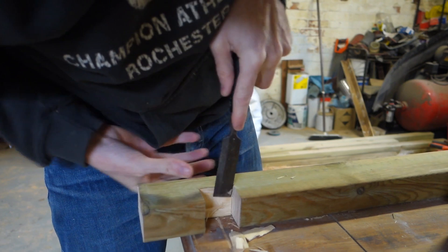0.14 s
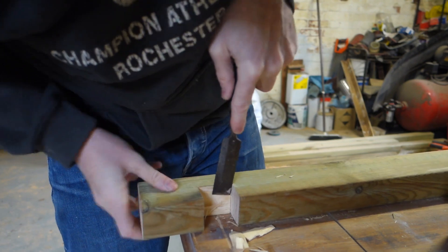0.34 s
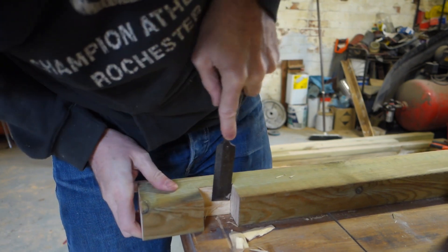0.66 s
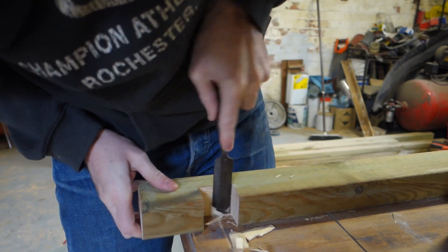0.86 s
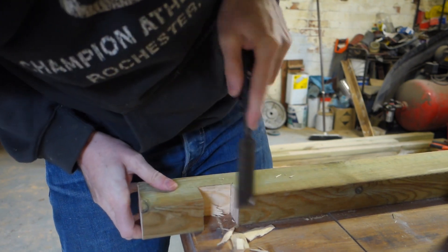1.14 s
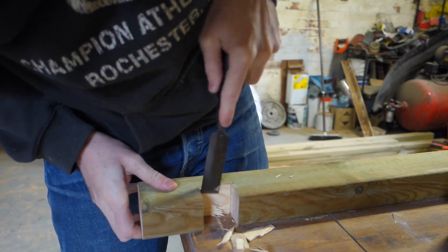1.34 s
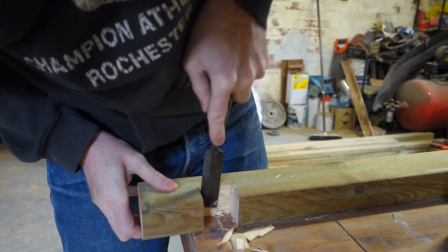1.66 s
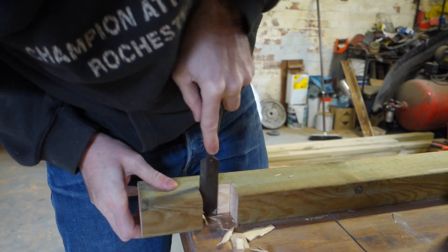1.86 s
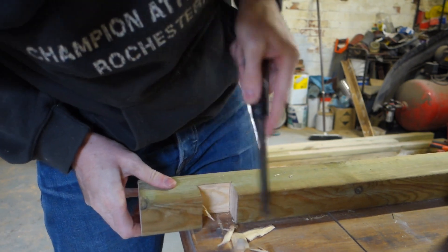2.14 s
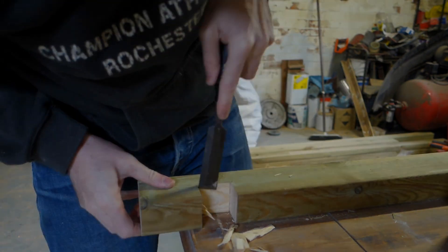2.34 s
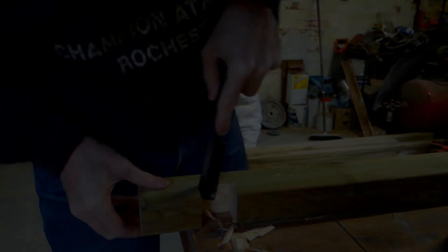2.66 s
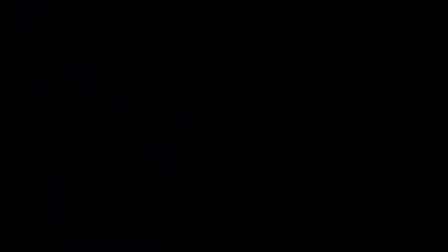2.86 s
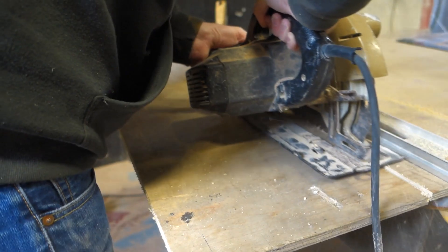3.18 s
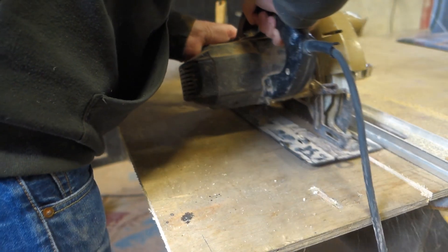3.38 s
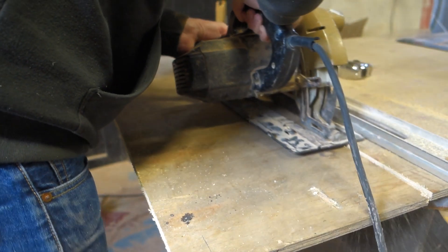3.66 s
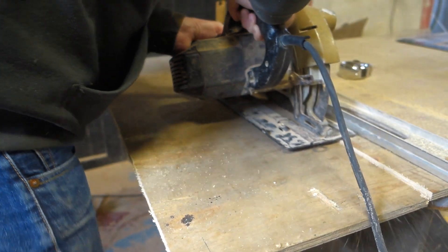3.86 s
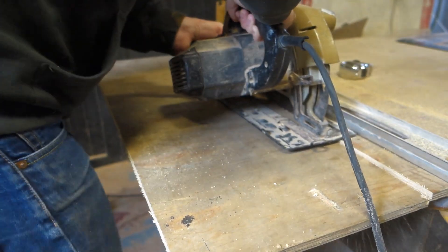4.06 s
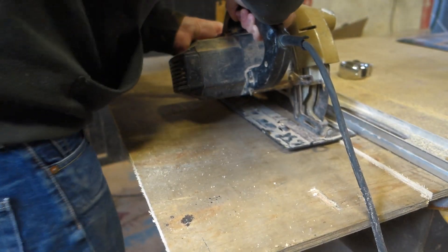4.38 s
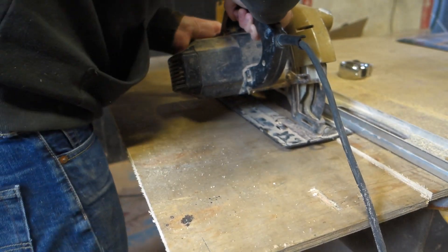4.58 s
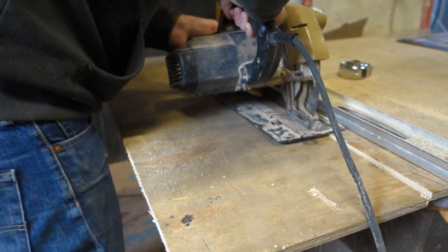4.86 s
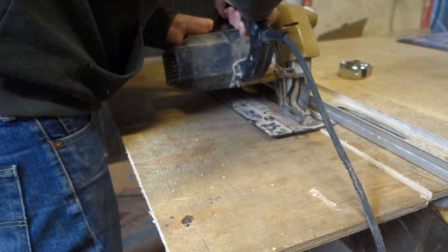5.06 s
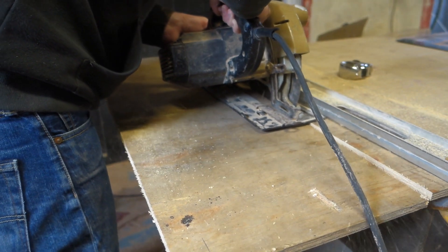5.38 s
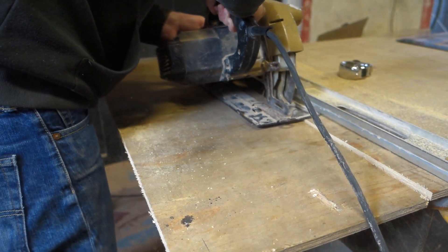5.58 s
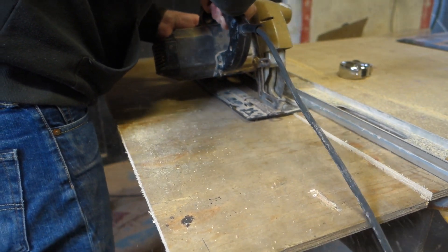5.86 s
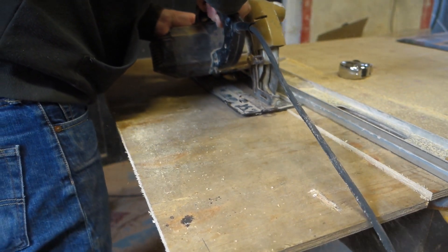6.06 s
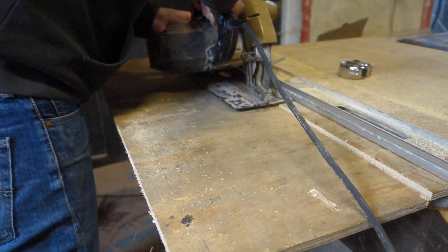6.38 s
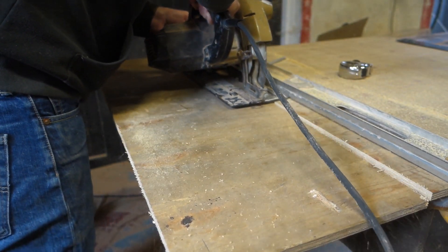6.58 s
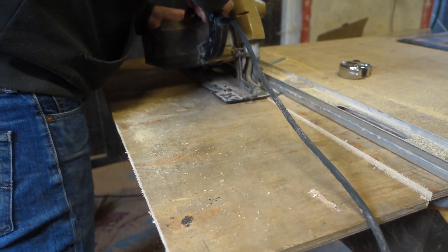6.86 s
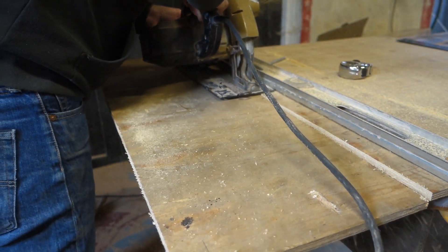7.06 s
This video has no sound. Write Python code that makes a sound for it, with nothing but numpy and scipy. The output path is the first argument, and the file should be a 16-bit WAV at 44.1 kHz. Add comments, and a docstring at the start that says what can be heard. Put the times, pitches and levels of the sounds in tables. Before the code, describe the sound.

Close up in a small workshop, a chisel works into a softwood beam with a few sharp knocks, short crunching scrapes, tiny splinter snaps and dull thumps against the bench. This fades away. About three seconds in, a circular saw cuts in abruptly, already ripping a board, slightly to the right. It rasps steadily, with a ringing blade, hissing chips and a high whine, then a lower motor hum near the end.

```python
"""A chisel is pushed and tapped into a softwood beam, close to a stereo microphone in a small workshop.
Knocks ring the beam; the edge sticks and slips, shaking the bench and tearing fibres; the sound fades out.
Hard cut at about 3 s to a circular saw ripping a board, right of the microphone and drifting to the middle:
its teeth shake the blade's modes, chips hiss, the board rumbles, the gears whine and the motor hums."""
import sys
import numpy as np
from scipy import signal
from scipy.fft import rfft, irfft, next_fast_len
from scipy.io import wavfile
from scipy.ndimage import uniform_filter1d

SR = 44100
rng = np.random.default_rng(int(sys.argv[2]) if len(sys.argv) > 2 else 0)


def unload_wav(signal):
    """Save mono or channel-first audio to the path in sys.argv[1] as 16-bit WAV at rate SR, clipped to [-1, 1]."""
    wavfile.write(
        sys.argv[1],
        SR,
        np.round(np.clip(np.atleast_2d(signal).T, -1, 1) * 32767).astype(np.int16),
    )


N = 318843
T = np.arange(N) / SR
CUT_S = 2.9772  # from chisel to saw

# the saw's course through the board: time_s, cutting_db, chips_db
SAW_LEVELS = [(2.99, -18.5, -24), (3.1, -19, -25), (3.52, -19.5, -24), (3.64, -20.5, -23),
              (4.05, -16, -24.5), (4.31, -21, -32), (4.6, -23, -23.5), (4.7, -15, -21.5),
              (4.76, -20, -25.5), (4.96, -19, -21), (5.02, -22, -22), (5.16, -16, -18), (5.2, -19, -20.5),
              (5.3, -20.5, -21.5), (5.36, -15.5, -18), (6.1, -17, -19), (6.6, -16.5, -17),
              (6.76, -15.5, -18.5), (6.83, -20, -20.5), (6.87, -15.5, -13), (7.16, -18, -18.5),
              (7.18, -15.5, -21), (7.23, -17, -15)]


def undb(db):
    return 10 ** (np.asarray(db) / 20)


def unit(x):
    return x / np.sqrt(np.mean(x ** 2))


def curves(table):
    """Join the rows by straight lines in time."""
    time_s, *columns = np.transpose(table)
    return [np.interp(T, time_s, column) for column in columns]


def ring(x, hz, width):
    """One resonance, gain 1 at its centre."""
    return signal.lfilter(*signal.iirpeak(hz, hz / width, SR), x)


def body(x, modes):
    """A set of resonances, balanced by their levels; unit RMS."""
    return unit(sum((-1) ** k * undb(db) * unit(ring(x, hz, width))
                    for k, (hz, width, db) in enumerate(modes)))


def colour(x, spectrum):
    """Shape a noise by (Hz, dB) points; unit RMS."""
    hz, db = np.transpose(spectrum)
    size = next_fast_len(N)
    bins = np.maximum(np.arange(size // 2 + 1) * SR / size, 1)
    gain = undb(np.interp(np.log(bins), np.log(hz), db))
    return unit(irfft(rfft(x, size) * gain, size)[..., :N])


def walk(rate):
    """Random levels held 1 / rate s and smoothed twice; spread near 1."""
    hold = int(SR / rate)
    steps = np.repeat(rng.standard_normal(N // hold + 1), hold)
    return 1.3 * uniform_filter1d(uniform_filter1d(steps, hold), hold)[:N]


def pair(wide):
    """Noise at the microphone's left and right; wide scales the part that is in antiphase."""
    mid, side = rng.standard_normal((2, N))
    return mid + wide * side * np.array([[1], [-1]])


def knocks():
    """Steel knocks on the beam: a short push and a few ms of edge chatter ring the wood's modes."""
    # blows: start_s, level_db, contact_ms
    blows = [(0.001, -12.5, 0.28), (0.075, -13.5, 0.43), (0.301, -44, 0.2), (1.01, -2.5, 0.46),
             (1.38, -7.5, 0.49), (1.845, -11.5, 0.19), (2.046, -18, 0.6), (2.394, -25, 0.4),
             (2.552, -64.5, 0.3), (2.845, -56, 0.6)]
    # modes of the beam: pitch_hz, level_db, t60_s
    modes = [(175, -3.5, 0.2), (248, -6.5, 0.18), (338, -4.5, 0.079), (437, -5, 0.09), (530.5, -0.5, 0.12),
             (630, -3.5, 0.13), (774, -1, 0.068), (897, 1.5, 0.095), (998, -3, 0.05), (1110, -7.5, 0.048),
             (1212, -4.5, .07), (1363, -10.5, 0.027), (1700, -8.5, 0.039), (2090, -10, 0.036),
             (2760, -10.5, 0.043), (2980, -12, 0.033)]
    force = np.zeros(N)
    contacts = rng.standard_normal((len(blows), 600)) * undb(-18.5 - 60 * T[:600] / 0.031)
    contacts[:, 0] += 0.26  # the impact that leads the chatter
    for (start_s, db, ms), contact in zip(blows, contacts):
        push = np.hanning(max(int(ms * SR / 1000), 2) + 2)  # a longer contact is duller
        blow = np.convolve(contact, push / push.sum())
        i = int(start_s * SR)
        force[i:i + len(blow)] += undb(db) * blow
    t = T[:SR // 2]
    beam = sum((-1) ** k * undb(db - 60 * t / t60) * np.sin(2 * np.pi * hz * t)
               for k, (hz, db, t60) in enumerate(modes))
    return undb(-12) * signal.fftconvolve(force, beam)[:N]


def slips(per_s, spread_db):
    """The edge sticks and lets go in random jerks of uneven size."""
    jerks = (rng.random(N) < per_s / SR) * rng.standard_normal(N)
    return jerks * undb(spread_db * np.minimum(rng.exponential(size=N), 4))


def soften(x, cutoff_hz):
    """Soft wood gives way gradually, which rounds off each slip."""
    return signal.sosfilt(signal.butter(2, cutoff_hz, fs=SR, output="sos"), x)


def bench_shudder(strength, centre_hz):
    """Coarse slips shake the bench; where the hand presses decides which modes take the shaking."""
    # modes of the bench: pitch_hz, width_hz, level_db
    modes = [(79, 23, -0.5), (131, 27, 1.5), (153, 18, 0.5), (184, 22, -3.5), (225.6, 19, 1),
             (290, 45, 1.5), (346.4, 25, 5), (454, 86, -1.5), (517, 43, 11.5)]
    shaking = ring(soften(slips(1200, 1.9), 600), 220, 450)
    shares = np.array([undb(db - 7.8 * np.log2(hz / centre_hz) ** 2) for hz, _, db in modes])
    shares /= np.sqrt(np.sum(shares ** 2, axis=0))
    return sum(ring(shaking * share * strength, hz, width) / np.std(ring(shaking, hz, width))
               for share, (hz, width, _) in zip(shares, modes))


def strokes():
    """Pushes of the chisel: coarse slips shake the bench, finer ones tear fibres, the finest hiss."""
    # pushes, levels at the stop: stop_s, length_s, growth_db, shudder_db, bench_hz, tearing_db, sliding_db
    pushes = [(0.006, 0.0063, -13, -23.5, 330, -29, -52), (0.05, 0.036, -11, -37, 291, -39, -66),
              (0.078, 0.03, 11, -26.5, 293, -37, -61), (0.447, 0.13, 6.5, -45.5, 149, -45, -64),
              (0.471, 0.033, 7, -39, 184, -40, -52.5), (0.592, 0.1, 5, -48, 190, -43, -56),
              (0.627, 0.044, 14, -28, 218, -26.5, -40.5), (0.71, 0.065, -3, -51, 220, -44, -64),
              (0.793, 0.073, 12, -17, 206, -21, -28.5), (0.875, 0.083, -2.5, -18, 184, -27, -46),
              (0.933, 0.057, -6, -30, 192, -36.5, -55), (1.023, 0.089, 2, -32, 225, -39.5, -49),
              (1.248, 0.2, -9, -55, 200, -57, -80), (1.476, 0.057, 9, -36, 212, -52.5, -75.5),
              (1.511, 0.04, 12, -32.5, 216, -40.5, -53), (1.626, 0.083, 5, -44.5, 200, -57.5, -70),
              (1.658, 0.028, 11, -29, 220, -29, -43), (1.707, 0.052, 8.5, -24, 191, -26, -30.5),
              (1.783, 0.06, -5, -46, 208, -45, -56), (1.836, 0.032, 4, -43, 180, -40, -41.5),
              (1.859, 0.019, 7, -13, 177, -23, -27.5), (1.92, 0.066, -3, -16, 202, -32, -58.5),
              (1.97, 0.045, 2, -19.5, 287, -29.5, -55), (2.044, 0.077, 5.5, -34, 170, -36.5, -51),
              (2.087, 0.05, -8, -40, 190, -46, -56), (2.36, 0.28, -11, -62.5, 160, -63, -79.5),
              (2.949, 0.39, 0, -74, 190, -87, -95)]
    # resonances of tearing fibres: pitch_hz, width_hz, level_db
    fibre_modes = [(633, 94, 1), (775, 380, 4.5), (953, 120, 1), (1165, 76, -4.5), (1313, 58, -3.5),
                   (1627, 140, -3), (1986, 150, -3), (2270, 260, -3.5), (3080, 770, -6), (3590, 740, -10)]
    # resonances of the sliding edge: pitch_hz, width_hz, level_db
    edge_modes = [(4340, 7400, -4), (6440, 760, -2), (8390, 1600, 2.5), (10600, 2800, 0)]
    stop, length, growth_db, shudder_db, bench_hz, tearing_db, sliding_db = np.transpose(pushes)[..., None]
    t = T[:3 * SR]
    to_go = np.clip((stop - t) / length, 0, 1)

    def effort(db, fall_db_per_s):
        """Each push swells or eases until the edge stops, then dies away; the strongest is heard."""
        shapes = (to_go < 1) * undb(db - growth_db * to_go - fall_db_per_s * np.clip(t - stop, 0, 1))
        return uniform_filter1d(np.pad(shapes.max(axis=0), (0, N - len(t))), size=120)

    bench = bench_shudder(effort(shudder_db, 450), np.interp(T, stop[:, 0], bench_hz[:, 0]))
    clumps = undb(3 * walk(70))  # fibres let go in bundles
    fibres = clumps * body(soften(slips(3500, 0.65), 3300), fibre_modes)
    hiss = undb(2 * walk(90)) * np.array([body(slips(8300, 1.5), edge_modes) for side in range(2)])
    return bench + effort(tearing_db, 400) * fibres, effort(sliding_db, 1500.5) * hiss


def room_tail(x):
    """The workshop's diffuse tail, shorter in the treble and different left and right."""
    # decay by band: centre_hz, t60_s
    bands = [(125, 0.46), (500, 0.25), (2000, 0.19), (8000, .2)]
    t = T[:SR]
    tail = 0
    for hz, t60 in bands:
        noise = pair(0.63 * min(hz / 450, 1.4))[:, :SR]
        tail += ring(noise, hz, 2.7 * hz) * undb(-60 * t / t60) / np.sqrt(hz * t60)
    return signal.fftconvolve(x[None], unit(tail) / np.sqrt(SR), axes=1)[:, :N]


def room_tone():
    """The still air of the workshop, fading out before the cut."""
    # spectrum of the air: frequency_hz, level_db
    spectrum = [(30, -7.5), (90, -3.5), (200, -19), (500, -9), (900, -18.5), (1300, -25.5), (2150, -18),
                (3600, -35.5), (11000, -39.5)]
    # fade-out: time_s, gain_db
    fade = [(2.25, 16), (2.5, -4.5), (2.75, -29.5), (2.97, -24.5)]
    return undb(-65.5 + 0.5 * walk(3.2) + curves(fade)[0]) * colour(pair(0.5), spectrum)


def splinters():
    """A splinter snaps with a tiny ping and a few ms of crackle."""
    # snaps: start_s, level_db, pitch_hz
    snaps = [(0.0378, -36, 9500), (0.0554, -44, 6060), (0.0744, -47, 8150), (0.2974, -58, 7790),
             (0.304, -42, 7700), (0.303, -36, 2300), (0.3296, -42.5, 2200), (0.3694, -45, 7070),
             (0.974, -27, 6200), (0.9844, -30.5, 8390), (1.004, -27.5, 10070), (1.8054, -38, 8000),
             (1.8292, -38.5, 9700), (2.0268, -38, 6470)]
    out, t = np.zeros(N), T[:300]
    crackles = rng.standard_normal((len(snaps), len(t))) * undb(-8.5 - 60 * t / 0.013)
    for (start_s, db, hz), crackle in zip(snaps, crackles):
        ping = np.sin(2 * np.pi * hz * t) * undb(-60 * t / 0.0023)
        i = int(start_s * SR)
        out[i:i + len(t)] += undb(db) * (ping + ring(crackle, hz, hz))
    return out


def thuds():
    """The chisel bottoms out and the beam thumps the bench: one low mode swells as the weight lands."""
    # thumps: start_s, level_db, pitch_hz, t60_s
    thumps = [(0.461, -23.5, 185, 0.078), (0.624, -15, 200, 0.076), (1.488, -16.5, 225, 0.055),
              (1.652, -12, 215, 0.071), (1.7, -8, 190, 0.064), (1.955, -10, 300, 0.058)]
    out, t = np.zeros(N), T[:SR // 4]
    swell = 1 - np.exp(-t / 0.0091)
    for start_s, db, hz, t60 in thumps:
        i = int(start_s * SR)
        out[i:i + len(t)] += undb(db + 9 - 60 * t / t60) * swell * np.sin(2 * np.pi * hz * t)
    return out


def chiselling():
    """The chisel close up, just right of centre, with the workshop behind it."""
    wood, hiss = strokes()
    treble = hiss + splinters()
    wood = wood + knocks() + thuds()
    near = wood * undb([[-0.4], [0.4]]) + treble * undb([[-1], [1]])
    return near + room_tone() + undb(-14) * room_tail(wood + treble[0])


def teeth(cutting_db, pan_db):
    """Saw teeth strike the wood too densely to count and merge into noise."""
    # spectrum of the cutting: frequency_hz, level_db
    spectrum = [(530, -52), (900, -28), (1110, -4.5), (1330, -3), (1430, -2.5), (1910, -5), (2420, -4.5),
                (5000, -6), (6500, -17.5), (11000, -120)]
    return undb(cutting_db - 3.5 + 0.45 * pan_db + 0.4 * walk(30)) * colour(pair(0.39), spectrum)


def chips(chips_db, pan_db):
    """Flying chips make a flickering hiss."""
    # spectrum of the hiss: frequency_hz, level_db
    spectrum = [(2650, -25), (4500, -26), (5370, -7), (6590, 3), (8700, 3), (9360, -4), (10600, 2.5),
                (11300, 0), (14700, -39), (22000, -120)]
    return undb(chips_db - 3 + pan_db + 1.8 * walk(30)) * colour(pair(0.12), spectrum)


def board(cutting_db):
    """The board rumbles with the cutting and bumps on its supports, hardest late in the cut."""
    # spectrum of the rumble: frequency_hz, level_db
    spectrum = [(15, -59), (25, -36), (282, -8), (319, -13.5), (402, -6.5), (523, -8.5), (746, -4),
                (898, -14), (1000, -4), (1300, -2), (2200, -120)]
    # jolts on the supports: time_s, rise_db
    jolts = [(3.2, 3.5), (3.99, 1.5), (4.7, 5.5), (5.15, 4), (5.37, 3), (5.62, 5), (5.87, 1), (6.03, 2.5)]
    jolt_db = sum(db * np.exp(-((T - time_s) / 0.028) ** 2) for time_s, db in jolts)
    rumble_db = -32.5 + 0.32 * (cutting_db + 18) + jolt_db + 0.97 * walk(16)
    rumble = undb(rumble_db) * colour(pair(0.35), spectrum)
    bump_db = -55 - 5.9 * np.abs(T - 6.1) + 2.2 * jolt_db + 3.1 * walk(14)
    return rumble + undb(bump_db) * unit(ring(ring(pair(0.05), 78, 97), 78, 97))


def blade(cutting_db, chips_db, pan_db):
    """The teeth ring the blade's modes, which swell and sink as it wobbles in the kerf."""
    # modes of the blade: pitch_hz, width_hz, level_db, loudest_s, fall_db_per_s
    modes = [(419, 7.7, -38.5, 2.06, 5), (617, 11, -42.5, 4, 1), (1056, 18, -32, 4.4, 4.5),
             (1171, 9.2, -31.5, 3.35, 10), (1099, 11, -25.5, 12, 6), (1138, 8.9, -26, 7.7, 4),
             (1233, 67, -27.5, 4.57, 10), (1408, 11, -28.5, 4.0, 6.5), (1464, 23, -27.5, 3.9, 1.5),
             (1683, 18, -30, 4.14, 4.5), (1762, 13, -33.5, 5.8, 4), (1850, 14.5, -26, 3.2, 2.5),
             (1968, 11.6, -24, 5.05, 15), (1998, 7.8, -28.5, 7.2, 6), (2064, 5.4, -38, 1.5, 0.5),
             (2298, 4.3, -30.5, 2.4, 3.5), (2495, 30, -39, 3.4, 3), (3166, 46, -29.5, 4.6, 1),
             (4065, 70, -30.5, 4.84, 3.5), (4620, 50, -30.5, 3.2, 1.5), (5250, 30, -31.5, 6.2, 5),
             (5366, 47, -30.5, 4.8, 2), (5527, 37, -30, 6.56, 5.5), (5750, 53, -30, 3.8, 3.5),
             (5976, 32, -34, 4.4, 0.5), (6150, 76, -32.5, 4.6, 1), (6740, 30, -33.5, 4.1, 6),
             (7176, 79, -28.5, 5.3, 3.5), (7724, 54, -28, 6.2, 1.5), (8370, 35, -25.5, 6.87, 6),
             (8560, 35, -26, 10.6, 20.5), (8850, 40, -28.5, 7.4, 3), (9440, 51, -31.5, 6.65, 4.5)]
    narrow, wide = pair(0.084), pair(0.5)
    out = 0
    for hz, width, db, loudest_s, fall_db_per_s in modes:
        treble = min(hz / 5000, 1)  # the treble is more directional and follows the chips
        drive_db = (1 - treble) * 1.54 * (cutting_db + 19.5) + treble * 0.35 * (chips_db + 23)
        sink_db = np.minimum(fall_db_per_s * np.abs(T - loudest_s), 12)
        level_db = db - sink_db + drive_db + 2 * walk(6) + treble * pan_db
        out += undb(level_db) * unit(ring(narrow if hz < 2600 else wide, hz, width))
    return out


def tone(hz, db, waver):
    """A rotating part's note, wavering a little in speed and strength."""
    amplitude = np.sqrt(2) * undb(db + 3.05 * walk(45))
    cycles = np.cumsum(hz * (1 + waver * walk(40))) / SR
    return amplitude * np.sin(2 * np.pi * cycles)


def gear_whine(pan_db):
    """The gears whine, rising as the load eases, with weaker notes an octave above and below."""
    # course of the whine: time_s, pitch_hz, level_db
    whine = [(2.99, 3586, -31.5), (3.5, 3605, -30), (3.85, 3660, -29), (4.05, 3746, -31), (4.25, 4016, -33),
             (4.5, 4226, -31.5), (4.7, 4150, -32), (4.9, 4110, -30), (5.0, 4090, -46)]
    hz, db = curves(whine)
    db -= 60 * np.clip(T - whine[-1][0], 0, 2)  # dies away after the last row
    note = tone(hz, db, waver=0.00244) * undb(0.7 * pan_db)
    above = tone(2 * hz, db - 7.5, waver=0.00206) * undb(pan_db)
    return note + above + tone(hz / 2, db - 7, waver=0.00298)


def motor_hum():
    """The motor's hum and its octave sag in pitch under load."""
    # course of the hum: time_s, pitch_hz, level_db, octave_db
    hum = [(5.85, 409, -51, -53), (6.03, 398, -35.5, -35), (6.15, 387, -37, -43), (6.4, 371, -36.5, -38),
           (6.75, 365, -37.5, -35), (6.9, 364, -53, -36), (7.23, 363.6, -46, -33.5)]
    hz, db, octave_db = curves(hum)
    rise_db = 80 * np.clip(T - hum[0][0], -2, 0)  # fades in up to the first row
    return tone(hz, db + rise_db, waver=0.0097) + tone(2 * hz, octave_db + rise_db, waver=0.0055)


def saw():
    """The whole saw, right of the microphone and drifting towards the middle."""
    cutting_db, chips_db = curves(SAW_LEVELS)
    balance_db = -8 + 1.5 * (T - CUT_S)  # left minus right, for the highest sounds
    pan_db = np.array([balance_db, -balance_db]) / 2
    wood = teeth(cutting_db, pan_db) + chips(chips_db, pan_db) + board(cutting_db)
    left, right = wood + blade(cutting_db, chips_db, pan_db) + gear_whine(pan_db) + motor_hum()
    allpass = 0.458  # the sound reaches the left side a fraction of a sample later
    return np.array([signal.lfilter([allpass, 1], [1, allpass], left), right])


def scene():
    """The chisel, then a hard cut to the saw."""
    return np.where(T >= CUT_S, saw(), chiselling())


def record(dry):
    """The recorder rounds the loudest peaks and cuts steeply above 11 kHz."""
    rounded = np.tanh(0.8 * dry) / 0.8
    return signal.sosfilt(signal.ellip(14, 0.2, 75, 11020, fs=SR, output="sos"), rounded)


dry = scene()
out = record(dry)
unload_wav(out)
```